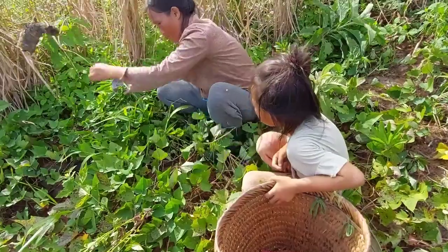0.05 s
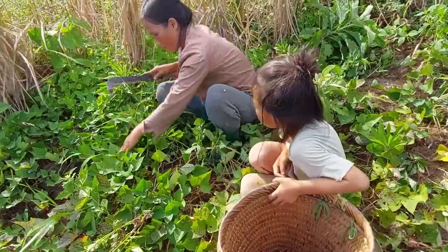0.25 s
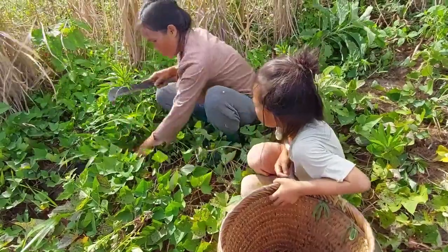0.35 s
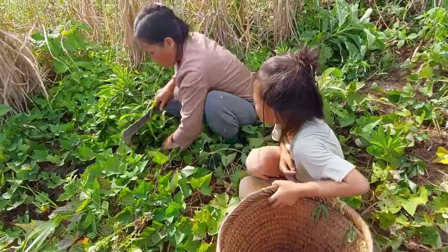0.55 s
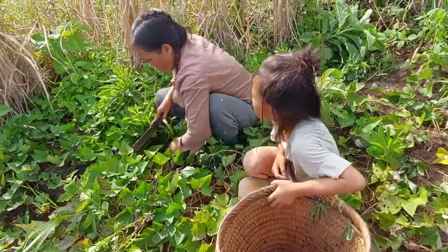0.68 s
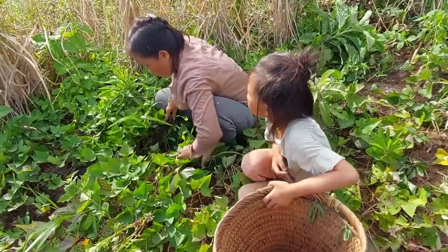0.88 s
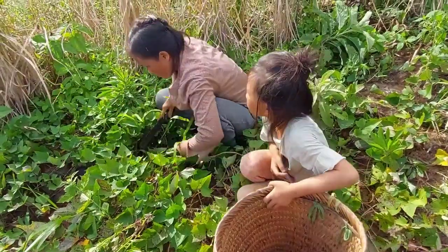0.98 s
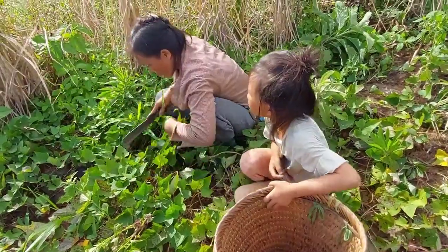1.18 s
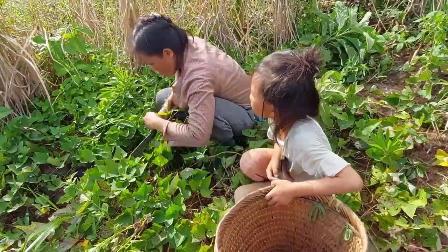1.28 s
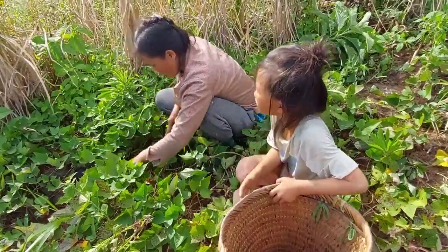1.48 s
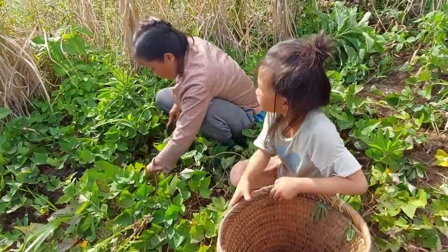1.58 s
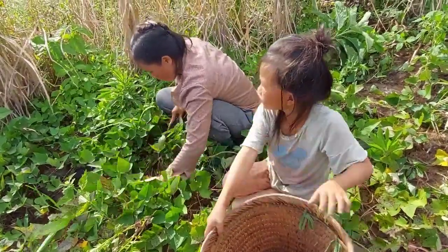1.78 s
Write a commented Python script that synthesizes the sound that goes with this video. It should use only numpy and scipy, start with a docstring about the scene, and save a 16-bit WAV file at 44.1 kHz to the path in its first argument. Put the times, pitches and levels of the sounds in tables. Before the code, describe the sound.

Leafy vines yanked up with a loud crisp rustle, then softer scraping in a quiet field

```python
"""Leafy vines are pulled up in a field, a little to the right: a loud rush of leaves settles into soft scraping.
Leaves and stems are thousands of tiny damped contacts, coloured and faded by level curves; snaps are short bursts.
A hollow band of noise swishes, the bundle scuffs and flops on the soil, and low throbs of air bump the microphone.
Behind lie far insects, a fluttering narrow hiss to the left, and the faint coloured noise of open air."""
import sys
import numpy as np
from scipy import signal
from scipy.fft import rfft, irfft, next_fast_len
from scipy.io import wavfile
from scipy.ndimage import uniform_filter1d, map_coordinates

SR = 44100
rng = np.random.default_rng(int(sys.argv[2]) if len(sys.argv) > 2 else 0)


def dump(signal):
    """Clip the signal to [-1, 1] and save it as 16-bit WAV at the path in sys.argv[1]."""
    limited = np.clip(np.atleast_2d(signal).T, -1, 1)
    pcm = np.round(limited * 32767).astype(np.int16)
    wavfile.write(sys.argv[1], SR, pcm)


N = 81585

# Tone of sliding leaves. Each row: frequency in Hz, relative level in dB.
LEAF_COLOUR = [(700, -33), (2300, -12), (2900, -9.5), (3500, -1), (4200, -2), (4900, -0.5), (5600, -7),
               (6500, -0.5), (7700, -7), (8700, -16), (11000, -12.5), (15500, -31)]
# Tone of the finest leaf crinkling. Each row: frequency in Hz, relative level in dB.
CRINKLE_COLOUR = [(2500, -34), (5000, -8), (7000, -6.5), (8700, -11), (10200, -9.5), (11500, -1),
                  (12300, -1.5), (13200, -5), (15500, -5.5)]


def leaves():
    """Leaves slide and crinkle in the same quick bunches, with crisp ticks of stiff edges flicking past."""
    # Leaves sliding over each other. Each row: time in seconds, level in dB before the bunching.
    slide_level = [(0, -64.5), (.19, -56), (.21, -49.5), (.24, -47), (.29, -38), (.335, -37.5), (.372, -36),
                   (.4, -41.5), (.5, -47), (.65, -49), (.69, -53.5), (.82, -49.5), (.9, -57), (.98, -57),
                   (1.02, -62), (1.17, -63), (1.35, -72), (1.57, -64), (1.65, -56.5), (1.78, -54),
                   (1.85, -60)]
    # Crinkling, which grows when the leaves are handled hard.
    # Each row: time in seconds, level in dB before the trim and bunching.
    crinkle_level = [(0, -65), (.19, -57.5), (.265, -36.5), (.295, -33), (.335, -39), (.37, -35),
                     (.41, -42.5), (.5, -47.5), (.7, -55), (.81, -50), (.9, -60.5), (.98, -56),
                     (1.01, -66.5), (1.35, -71.5), (1.56, -68), (1.65, -62), (1.77, -56), (1.85, -84)]
    crinkle_trim_db = 3

    slide = crackle(per_s=9000, spread_db=-0.5, life_s=0.00028, top_hz=14830)
    slide = coloured(slide + amp(-0.5) * noise(alike=0.27), LEAF_COLOUR)
    crinkle = crackle(per_s=6000, spread_db=2.0, life_s=0.00012, top_hz=17650)
    crinkle = coloured(crinkle + amp(7.5) * noise(alike=0.033), CRINKLE_COLOUR)
    ticks = coloured(crackle(per_s=460, spread_db=-0.5, life_s=0.00007, top_hz=13900), LEAF_COLOUR)

    sliding = level(slide_level) * unit(patchy(slide) + amp(-7) * ticks)
    crinkling = amp(crinkle_trim_db) * level(crinkle_level) * patchy(crinkle)
    return clumps(rate=190, depth_db=0.84) * (sliding + crinkling)


def stems():
    """Stems rub through the tangle with a coarser, lower grain."""
    # Stems dragging. Each row: time in seconds, level in dB before the trim.
    drag_level = [(0, -79), (.19, -69), (.29, -56), (.36, -64), (.5, -59), (.65, -60), (.74, -69.5),
                  (.8, -63.5), (1.02, -76), (1.35, -94.5), (1.53, -80.5), (1.65, -66.5), (1.76, -61),
                  (1.85, -73)]
    # Tone of the stems. Each row: frequency in Hz, relative level in dB.
    stem_colour = [(600, -22.5), (1200, -9), (1600, 3), (2100, -2.5), (3000, 8), (5000, -10.5),
                   (8000, -6.5), (15000, -31)]
    trim_db = 5.5
    grains = crackle(per_s=5000, spread_db=0.5, life_s=0.00066, top_hz=9850)
    return amp(trim_db) * level(drag_level) * patchy(coloured(grains, stem_colour))


def snaps():
    """Each breaking fibre is a noise burst around its own pitch, over a skirt of leaf tone."""
    # Stems that snap. Each row: start in seconds, level in dB, pitch in Hz, decay time in seconds.
    snap_events = [(0.105, -45.5, 7100, 0.0017), (.1565, -46.5, 12100, 0.012),
                   (0.2022, -39.5, 4900, 0.0069), (0.226, -39.5, 11600, 0.0038), (0.282, -39, 5500, 0.0033),
                   (0.2906, -31.5, 5000, 0.002), (0.3678, -34.5, 11300, 0.0028), (0.736, -38, 5730, 0.0029),
                   (0.819, -37, 12400, 0.0028), (0.9434, -47, 12200, 0.0023), (1.422, -56, 11400, 0.012),
                   (1.64, -44, 3000, 0.0014), (1.647, -50, 4700, 0.0091), (1.7433, -38, 4770, 0.0011),
                   (1.812, -46.5, 4600, 0.0041)]
    width_octaves, skirt_db, rise_s = 0.27, 1, 0.00011
    out = np.zeros((2, N + SR))  # spare room for the last bursts
    t = np.arange(2048) / SR
    f = np.fft.rfftfreq(len(t), 1 / SR) + 1  # 1 Hz up, so the logarithm is safe
    skirt = amp(skirt_db) * (amp(along(LEAF_COLOUR, f)) + amp(along(CRINKLE_COLOUR, f)))
    for start_s, db, hz, decay_s in snap_events:
        peak = np.exp(-0.5 * (np.log2(f / hz) / width_octaves) ** 2)
        burst = unit(irfft(rfft(rng.standard_normal((2, len(t)))) * (peak + skirt)))
        first = round(start_s * SR)
        out[:, first:first + len(t)] += amp(db) * burst * strike(t, rise_s, decay_s)
    return out[:, :N]


def swish():
    """The tossed bundle sweeps into the bed of leaves with a hollow swish, a narrow noise band that dies away."""
    start_s, level_db, rise_s, fall_s = 0.273, -56.5, 0.0036, 0.19
    centre_hz, width_hz = 983, 128
    band = unit(filtered(noise(alike=0.1), lambda hz: np.exp(-0.5 * ((hz - centre_hz) / width_hz) ** 2)))
    return amp(level_db) * strike(np.arange(N) / SR - start_s, rise_s, fall_s) * band


def brush():
    """The bundle scuffs over the soil and clumps land softly; the upper scuffs reach the ports out of step."""
    # Bundle brushing the soil. Each row: time in seconds, level in dB before the trim.
    scuff_level = [(0, -86.5), (.22, -68.5), (.31, -62.5), (.355, -60), (.47, -57.5), (.51, -63.5),
                   (.8, -71), (1.05, -83), (1.45, -86), (1.72, -71), (1.85, -75)]
    # Tone of the scuffs. Each row: frequency in Hz, relative level in dB.
    scuff_colour = [(40, -11), (100, -2.5), (430, 0), (630, -13), (820, -3), (1020, -3.5), (1300, -13.5),
                    (2500, -8)]
    # Clumps flopping onto the ground. Each row: start in seconds, level in dB, decay time in seconds.
    flop_events = [(0.346, -47.5, 0.02), (0.37, -55, 0.0092), (0.417, -54.5, 0.016), (0.821, -67, 0.024),
                   (1.742, -65.5, 0.032)]
    # Tone of the flops. Each row: frequency in Hz, relative level in dB.
    flop_colour = [(170, -20), (260, -2), (420, -1), (520, -5.5), (680, -15), (980, -6), (2500, -23)]
    trim_db, flop_rise_s = 2.5, 0.00086

    scuff = crackle(per_s=1800, spread_db=2, life_s=0.00044, top_hz=2290)
    scuff = coloured(scuff + amp(1.0) * noise(alike=1.0), scuff_colour)
    t = np.arange(N) / SR
    landings = sum(amp(db) * strike(t - start_s, flop_rise_s, decay_s) for start_s, db, decay_s in flop_events)
    flops = landings * coloured(noise(alike=1.0), flop_colour)

    lean_db = [(480, 6.5), (740, -5), (1100, 1.5)]  # (Hz, dB of right over left)
    lead = [(420, 0.071), (950, 1.71)]  # (Hz, radians by which the left leads)
    ground = leaning(amp(trim_db) * level(scuff_level) * scuff + flops, lean_db)
    return filtered(ground, lambda hz: np.exp(1j * along(lead, hz) * np.array([[0.5], [-0.5]])))


def bumps():
    """Puffs of air push on the microphone ports: a brief low throb with a little rumble, swelling and fading."""
    # Dull air bumps. Each row: centre in seconds, level in dB, pitch in Hz, spread in seconds,
    # side from 0 (left) to 1 (right).
    puffs = [(0.261, -41, 103, 0.009, 0.91), (0.288, -43, 66.5, 0.0029, 0.78), (0.441, -57, 79.5, 0.052, 1),
             (0.751, -55.5, 60, 0.02, 0.66), (1.409, -53.5, 59, 0.012, 0.98),
             (1.502, -47, 66.5, 0.0094, .05), (1.598, -45.5, 65.5, 0.012, .05),
             (1.634, -55, 65, 0.033, 0.062)]
    out = np.zeros((2, N))
    rumble = coloured(noise(alike=0), [(25, -30), (55, 6.0), (240, -19), (600, -37), (3000, -85)])
    for centre_s, db, hz, spread_s, right in puffs:
        t = np.arange(N) / SR - centre_s
        swell = np.exp(-0.5 * (t / spread_s) ** 2)
        push = amp(db) * swell * (np.cos(2 * np.pi * hz * t) + amp(-8.5) * rumble)
        turn = np.clip(right, 0, 1) * np.pi / 2
        out += np.array([[np.cos(turn)], [np.sin(turn)]]) * push
    return out


def insects():
    """Far insects make a thin chorus to the left: a narrow band of hiss that flutters."""
    centre_hz, width_hz, level_db = 7870, 260, -69
    band = filtered(noise(alike=0), lambda hz: np.exp(-0.5 * ((hz - centre_hz) / width_hz) ** 2))
    return amp(level_db) * clumps(rate=59, depth_db=1.7) * unit(band * [[1], [0.5]])


def open_air():
    """The faint outdoor hiss is coloured noise whose tone drifts."""
    # Tone of the open air. Each row: frequency in Hz, relative level in dB.
    air_colour = [(20, -1.5), (90, 12.5), (160, -1), (320, 1.5), (550, -10), (1200, -15), (5000, -13),
                  (8700, -25), (12000, -14), (15500, -43)]
    level_db = -73
    return amp(level_db) * patchy(coloured(noise(alike=0.36), air_colour))


def crackle(per_s, spread_db, life_s, top_hz, size=128):
    """Countless tiny damped contacts, each with its own moment, pitch, strength and direction."""
    lag_s, lag_spread_s = 0.00011, 0.00005  # the right port hears later; the leaves lie spread out
    u = rng.random((int(per_s * N / SR), 5))
    start = (u[:, :1] * N).astype(int)
    hz = u[:, 1:2] * top_hz
    strength = amp(spread_db * np.minimum(-np.log(1 - u[:, 2:3]), np.log(60)))
    lag = lag_s + lag_spread_s * np.log((u[:, 3:4] + 1e-6) / (1 - u[:, 3:4]))
    turn = u[:, 4:5] * np.pi / 2
    sides = []
    for delay, gain in ((0, np.cos(turn)), (lag, np.sin(turn))):
        t = np.maximum(np.arange(size) / SR - delay, 0)
        grains = strength * np.sqrt(gain) * np.exp(-t / life_s) * np.sin(2 * np.pi * hz * t)
        places = start + np.arange(size)
        sides.append(np.bincount(places.ravel(), grains.ravel(), N + size)[:N])
    return unit(np.array(sides))


def clumps(rate, depth_db):
    """Uneven gain wanders smoothly between random knots (rate per second), bunching or fluttering a sound."""
    knots = rng.standard_normal(4096)
    return unit(amp(depth_db * map_coordinates(knots, [np.arange(N) * rate / SR], mode="wrap")))


def patchy(x, size=512):
    """Colour drifts in small patches of pitch and time, as when different leaves come into contact."""
    shift_db = 2.04  # rms
    z = signal.stft(x, nperseg=size)[2]
    field = uniform_filter1d(rng.standard_normal(z.shape[1:]), size=5, axis=0)  # across pitch
    field = unit(uniform_filter1d(field, size=6, axis=1))  # across time
    return unit(signal.istft(z * amp(shift_db * field), nperseg=size)[1][:, :N])


def strike(t, rise_s, length_s):
    """A quick rise and an exponential fall, peaking at 1."""
    t = np.maximum(t, 0)
    envelope = (1 - np.exp(-t / rise_s)) * np.exp(-t / length_s)
    return envelope / envelope.max()


def noise(alike):
    """Stereo white noise, partly shared by both sides."""
    share = np.clip(alike, 0, 1)
    common = np.sqrt(share) * rng.standard_normal(N)
    return common + np.sqrt(1 - share) * rng.standard_normal((2, N))


def leaning(x, lean_db):
    """Tip the balance at each frequency by (Hz, dB of right over left) points."""
    return filtered(x, lambda hz: amp(along(lean_db, hz) * np.array([[-0.5], [0.5]])))


def coloured(x, colour):
    """Filter x by (Hz, dB) points, then scale to rms 1."""
    return unit(filtered(x, lambda hz: amp(along(colour, hz))))


def filtered(x, response):
    """Multiply the spectrum of x by a response of frequency."""
    m = next_fast_len(N + SR // 4)
    return irfft(rfft(x, m) * response(np.fft.rfftfreq(m, 1 / SR)), m)[..., :N]


def along(points, hz):
    """Interpolate (Hz, value) points on a log frequency axis."""
    f, v = np.transpose(points)
    return np.interp(np.log(hz + 1), np.log(f + 1), v)


def level(rows):
    """Gain per sample from (seconds, dB) rows."""
    return amp(np.interp(np.arange(N) / SR, *np.transpose(rows)))


def amp(db):
    """Decibels to gain."""
    return 10 ** (np.asarray(db) / 20)


def unit(x):
    """Scale to rms 1."""
    return x / np.sqrt(np.mean(x ** 2) + 1e-20)


def scene():
    """Vines with their stereo lean, then swish, soil, air bumps, insects and open air."""
    # Stereo balance of the vines. Each row: frequency in Hz, right over left in dB.
    vine_lean = [(1500, -5.5), (3300, 3), (5300, 6.5), (8000, -3), (11000, 11), (15000, 6)]
    vines = leaning(leaves() + stems() + snaps(), vine_lean)
    return vines + swish() + brush() + bumps() + insects() + open_air()


def record(dry):
    """Nothing is kept above the band limit."""
    top_hz = 15600
    return filtered(dry, lambda hz: hz < top_hz)


dry = scene()
out = record(dry)
dump(out)
```